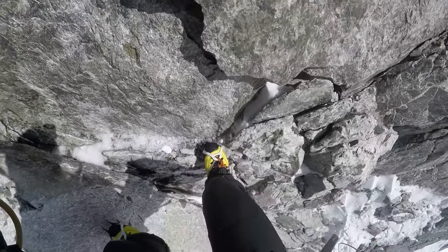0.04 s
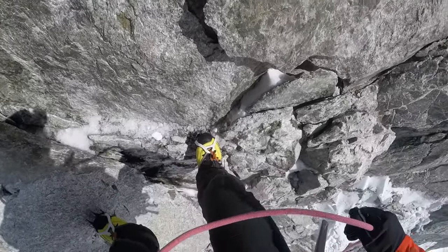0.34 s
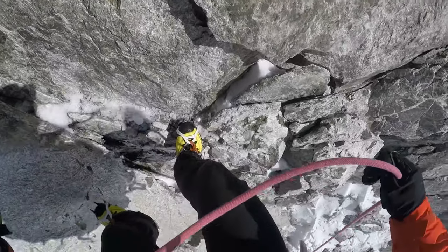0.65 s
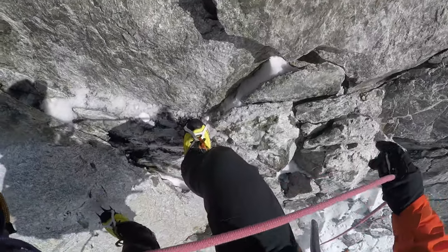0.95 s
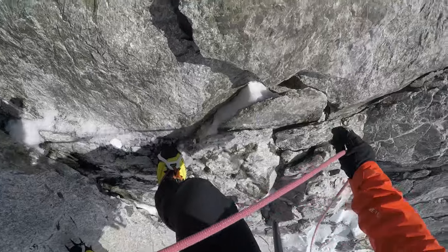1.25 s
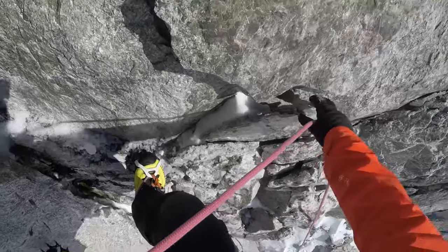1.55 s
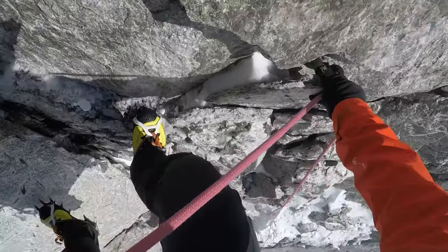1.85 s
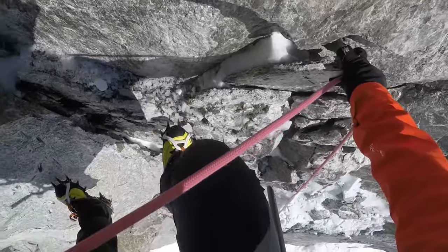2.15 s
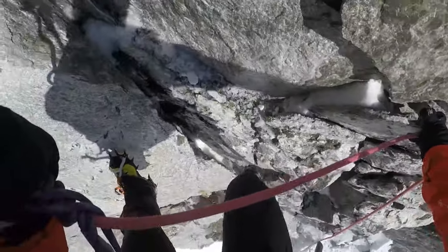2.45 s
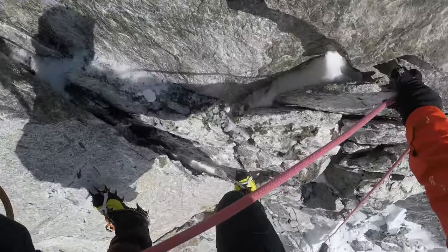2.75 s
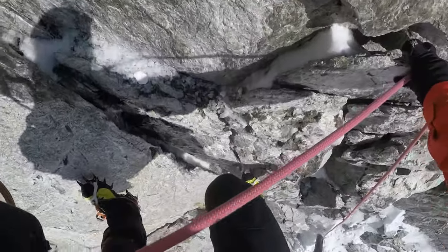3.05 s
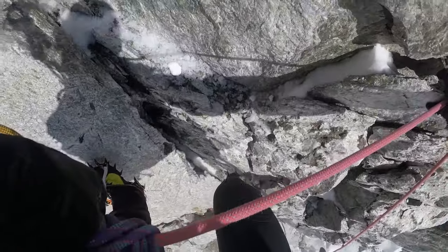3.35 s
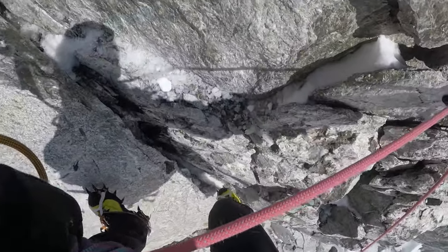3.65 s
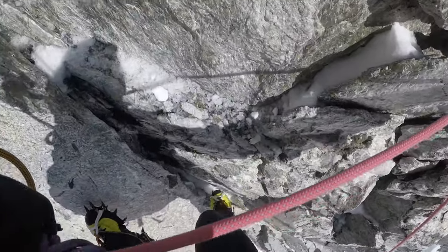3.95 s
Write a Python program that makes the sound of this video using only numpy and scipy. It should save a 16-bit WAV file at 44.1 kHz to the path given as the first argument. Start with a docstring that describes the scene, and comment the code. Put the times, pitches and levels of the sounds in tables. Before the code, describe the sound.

Steel crampon points tick, scrape and faintly squeak on granite as a climber shifts footing, with a cluster of bites midway and one hard strike later. Gusts rumble and pop on the body-worn microphone, and clothing rustles softly.

```python
"""From the start, gusts rumble, thump and pop on a worn camera's two microphone ports; clothing rustles.
A body's length below, steel crampon points tick, bite, scrape and squeak on granite.
Near-mono for about a second, then the sound opens into stereo.
Bites cluster just after 2 s, the pops peak near 2.6 s, and a hard strike lands at 3.3 s."""
import sys
import numpy as np
from scipy import signal
from scipy.fft import rfft, irfft, next_fast_len
from scipy.io import wavfile
from scipy.ndimage import uniform_filter1d, map_coordinates

SR = 44100
rng = np.random.default_rng(int(sys.argv[2]) if len(sys.argv) > 2 else 0)


def master_out(mix):
    """Clip the mix to full scale and print it as 16-bit PCM to the path in sys.argv[1]."""
    frames = np.transpose(np.atleast_2d(mix))
    ceiling = np.clip(frames, -1, 1)
    pcm = np.round(ceiling * 32767).astype(np.int16)
    wavfile.write(sys.argv[1], SR, pcm)


N = 176400
TIME_S = np.arange(N) / SR

# envelopes of clothing, rumble, gusts (time [s], relative level [dB])
RUSTLE_LEVEL = [(0.0, -49), (0.26, -47.5), (0.89, -49.5), (1.71, -47.5), (1.84, -49.5), (2.62, -49.5),
                (2.74, -49.5), (2.85, -45.5), (2.94, -48.5), (3.33, -50.5), (3.83, -50.5), (4.0, -45.5)]
RUMBLE_LEVEL = [(0.0, -19.5), (.14, -23.5), (0.22, -26.5), (.3, -23.5), (0.51, -26), (0.77, -24.5),
                (0.81, -30), (.89, -25.5), (1.04, -24.5), (1.11, -25.5), (1.54, -24.5), (1.63, -25),
                (1.84, -24), (2.1, -25.5), (2.28, -21), (2.35, -24.5), (2.68, -21.5), (2.83, -26.5),
                (3.33, -24), (3.56, -24), (3.99, -25)]
GUST_LEVEL = [(0.0, -23.5), (0.09, -21), (.15, -27), (.21, -42.5), (0.268, -45.5), (0.283, -27), (.33, -27),
              (0.36, -40), (0.41, -24), (0.44, -36), (0.53, -24.5), (0.63, -42), (0.65, -32), (.7, -34.5),
              (0.73, -24), (.78, -32.5), (0.8, -50), (.89, -53), (0.93, -37), (0.95, -32.5), (1.02, -30),
              (1.07, -42), (1.13, -36.5), (1.21, -47.5), (1.32, -29.5), (1.37, -40.5), (1.41, -30),
              (1.53, -31.5), (1.55, -39), (1.83, -35.5), (1.9, -30.5), (1.96, -29), (2.02, -40.5),
              (2.14, -41.5), (2.17, -30.5), (2.24, -40.5), (2.27, -24), (2.35, -30), (2.37, -27),
              (2.51, -27.5), (2.65, -25.5), (2.75, -33.5), (2.88, -31.5), (2.92, -38), (3.05, -28),
              (3.1, -33), (3.2, -31.5), (3.27, -38.5), (3.32, -29), (3.44, -32), (3.46, -41.9),
              (3.5, -28.5), (3.57, -36.5), (3.64, -27), (3.75, -33), (3.87, -32), (3.9, -32), (3.99, -31.5)]
# noise spectra (frequency [Hz], relative density [dB])
RUSTLE_SPECTRUM = [(200, 18), (900, 0), (1500, 2), (2400, -1.5), (3300, -4.5), (4400, -2.5), (4800, -4.5),
                   (5800, 0.5), (7000, -3), (8200, -10), (10000, -11.5), (12500, -19.5), (15000, -55)]
RUMBLE_SPECTRUM = [(10, -5), (25, -2), (60, -0.5), (120, -5), (200, -14), (350, -31.5), (1000, -67)]
BUFFET_SPECTRUM = [(40, -27), (110, -3.5), (170, -1), (280, -4), (500, -10.5), (800, -18), (1300, -30),
                   (2500, -51), (8000, -77)]
POP_SPECTRUM = [(50, -9.5), (200, -2), (450, 0), (800, -6), (1200, -17.5), (2000, -39.5), (6000, -83)]
CLICK_SPECTRUM = [(300, 2), (1200, -7.5), (2500, 2), (4300, 1), (6000, 4), (7100, -1), (8200, -11.5),
                  (9600, -11.5), (11000, -24.5), (15000, -33)]
KNOCK_SPECTRUM = [(80, -95), (300, 1.5), (600, 1.5), (1000, -11.5), (1350, -13), (1900, -12), (3000, -20),
                  (8000, -61)]
# likeness of the ports; eddies push one, pull the other (frequency [Hz], correlation [-1..1])
WIND_CORRELATION = [(30, 0.58), (70, -0.0031), (150, 0.002), (260, -0.63), (450, -0.92), (800, -0.95),
                    (1300, -0.92), (2500, -0.84)]
SOUND_CORRELATION = [(300, 0.23), (2000, 0.18), (4000, 0.66), (7000, 0.043), (12000, 0.08)]
# wind balance (frequency [Hz], left over right [dB])
WIND_BALANCE = [(50, 0), (130, -2), (280, -6), (500, -4.5), (900, 0.5), (2000, -2)]
# small eddies (time [s], relative level [dB])
EDDY_POPS = [(.072, -11.5), (0.287, -33), (0.525, -19), (0.72, -15), (0.746, -22), (1.441, -19),
             (1.579, -19.5), (1.882, -18.5), (1.913, -13.5), (1.951, -15), (1.992, -14), (2.26, -15.5),
             (2.286, -20.5), (2.395, -17.5), (2.411, -12.5), (2.454, -15), (2.492, -14.5), (2.591, -15.5),
             (2.623, -10.5), (2.635, -10.5), (2.646, -12.5), (2.655, -9), (2.997, -19), (3.125, -19.5),
             (3.315, -16.5), (3.497, -22.5), (3.639, -17.5), (3.687, -19.5), (3.76, -20), (3.899, -20)]
# broad eddies (time [s], envelope peak [dB], pitch [Hz])
EDDY_THUMPS = [(0.138, -12, 119), (.286, -11.5, 163), (.409, -12.5, 79.5), (.502, -12.5, 108),
               (.524, -9.5, 121), (.65, -13, 117), (.723, -8.5, 124), (0.737, -16, 263), (.776, -15.5, 108),
               (0.966, -14.5, 153), (1.046, -16, 65), (1.44, -18, 129), (1.525, -11.5, 107),
               (1.915, -13, 209), (2.149, -13, 94), (2.497, -14.5, 110), (2.557, -13, 109),
               (2.686, -13, 69.5), (3.192, -16.5, 101.7), (3.356, -11, 64.4), (3.645, -17.5, 149)]
# ringing prongs (high) and hollow boot (low) (time [s], pitch [Hz], relative level [dB], t60 [s])
PART_RINGS = [(.023, 5940, -22.5, 0.045), (0.055, 4380, -27, 0.018), (.12, 2875, -35.5, 0.038),
              (.12, 5650, -39, 0.042), (.403, 2660, -33.5, 0.023), (.717, 595, -26, 0.038),
              (1.542, 933, -39, 0.059), (2.012, 4130, -32, 0.03), (2.053, 1687, -33, 0.091),
              (2.486, 688, -25, 0.029), (2.489, 2230, -26, 0.042), (2.846, 3690, -33.5, 0.035),
              (2.846, 6660, -30.5, 0.028), (2.961, 4180, -35, 0.047), (3.329, 5900, -32, 0.018),
              (3.329, 4500, -26, .02), (3.793, 3300, -29.5, 0.027)]
# sliding prongs (time [s], length [s], pitch [Hz], relative level [dB], roughness [0..1])
PRONG_SQUEAKS = [(0.032, 0.036, 6760, -30, 0.7), (.38, .018, 2520, -45, 0.5), (0.585, .012, 3170, -47, .6),
                 (1.214, .06, 5190, -50.5, .3), (1.29, 0.062, 5520, -51, .9), (2.2, .05, 5370, -55, .9),
                 (3.162, .03, 1850, -43, .7), (3.353, 0.011, 2920, -29, .2)]
# crampon frame modes (frequency [Hz], relative level [dB], t60 [s])
FRAME_MODES = [(2300, 5, 0.028), (3293, -2, 0.044), (3730, -3.5, 0.043), (4350, 3.5, 0.036),
               (5060, 1, 0.04), (5510, 3.5, 0.046), (5970, 2, 0.051), (6500, -21, .03), (7600, -14, 0.02),
               (7950, -30, .03), (9300, -19, .025)]
# points dragged on rock (time [s], length [s], relative level [dB], boot knock [dB], tilt [dB/octave])
POINT_SCRAPES = [(0.025, 0.042, -33.5, 3, 1.5), (0.052, 0.17, -50.5, 3, 3), (0.481, 0.084, -48.5, 11.5, 4),
                 (0.522, 0.05, -38, 1, -0.5), (1.292, 0.033, -66, -5, 10), (1.673, 0.059, -49.5, -7, 3),
                 (2.045, 0.041, -37, 4.5, 0), (2.524, 0.032, -49, 9, -1), (2.946, 0.023, -44.5, 0.5, 10),
                 (3.155, 0.042, -47, 10, -5), (3.35, 0.023, -43, -13, 0)]
# points striking rock (time [s], relative level [dB], t60 [s], boot knock [dB], tilt [dB/octave])
POINT_STRIKES = [(.002, -26.5, 0.049, 2, 3), (.0225, -22, 0.011, -13, 6), (.038, -27, 0.02, -11, 1),
                 (.056, -27.5, 0.02, -23, 2), (0.112, -39, 0.043, -2, 5), (.156, -46, 0.07, -20, 10),
                 (0.252, -36.5, 0.036, -23, 0), (0.326, -44, .02, -25, 1), (0.404, -35.5, 0.024, -17, 3.5),
                 (.5255, -31, .015, 3, 4), (.529, -34, 0.011, 6, 1), (0.542, -26.5, 0.022, -16, 3),
                 (.5495, -36, 0.011, -7, 1), (.56, -33, .014, 8, -2), (0.622, -39, 0.02, 7, -5),
                 (.829, -43, 0.019, 7, 3), (0.89, -31.5, 0.046, 3, 0.5), (1.113, -43.5, 0.027, 7.5, 8),
                 (1.175, -45.5, 0.049, -10, 4), (1.509, -39.5, 0.026, 6.5, -2),
                 (1.542, -39, 0.063, -18, -2.5), (1.905, -45, 0.0096, -17, -15),
                 (2.0098, -27.5, 0.039, -2, 8), (2.041, -28, 0.035, -8, -2),
                 (2.052, -35.5, 0.023, 17.5, 20), (2.0635, -30, 0.017, -14, 1),
                 (2.0905, -25.5, 0.033, 4, -1), (2.118, -29.5, 0.019, -7, -5.5),
                 (2.196, -30, 0.029, -12, -0.5), (2.321, -39, 0.032, -5, 3), (2.41, -46, 0.018, -19, -11),
                 (2.486, -31, 0.034, 9, -2), (2.555, -34.5, 0.018, -2, -2), (2.758, -30, 0.018, -20, 4),
                 (2.845, -29.5, 0.024, -11, 9.5), (2.957, -42, 0.056, 0, -5), (3.052, -37, 0.078, 3.5, 4),
                 (3.184, -33.5, 0.028, 7.5, 0), (3.3286, -19.5, 0.028, -2, 1.5), (3.335, -31, .014, 7, 6),
                 (3.367, -32.5, 0.041, 7.5, -3), (3.6, -39.5, 0.032, 8, 8), (3.788, -31, 0.048, 5, 3.5),
                 (3.793, -35, 0.026, 9, 4), (3.816, -45.5, 0.038, 18, 1), (3.996, -33, 0.026, 5, -1)]
# stereo image (time [s], width [0..1])
STEREO_WIDTH = [(0, 0.05), (.3, 0.02), (.45, 0), (.87, 0), (1.1, 0.21), (1.4, 0.62)]


def amp(db):
    """Decibels to gain."""
    return 10 ** (np.asarray(db) / 20)


def unit(x):
    """Scale to rms 1; a stereo pair by its centre."""
    centre = x.mean(0) if x.ndim > 1 else x
    return x / np.sqrt(np.mean(centre ** 2) + 1e-20)


def along(points, hz):
    """Interpolate on a log frequency axis."""
    knots_hz, values = np.transpose(points)
    return np.interp(np.log(hz + 1), np.log(knots_hz + 1), values)


def curve(rows):
    """Interpolate in time, one value per sample."""
    return np.interp(TIME_S, *np.transpose(rows))


def wobble(rate_hz):
    """Smooth curve through random knots."""
    knots = rng.standard_normal(int(N * rate_hz / SR) + 4)
    return map_coordinates(knots, [TIME_S * rate_hz], mode="nearest")


def steady(x, samples):
    """Even out the level, keep the finer grain."""
    power = np.mean(np.atleast_2d(x) ** 2, axis=0)
    local_power = np.abs(uniform_filter1d(uniform_filter1d(power, samples), samples))
    return unit(x / np.sqrt(local_power + 1e-9))


def noise(spectrum, correlation=SOUND_CORRELATION, balance=None):
    """Coloured stereo noise, centre rms 1."""
    hz = np.fft.rfftfreq(N, 1 / SR)
    spread_rad = np.arccos(np.clip(along(correlation, hz), -1, 1)) / 2
    coloured = rfft(rng.standard_normal((2, N))) * amp(along(spectrum, hz))
    mid, side = coloured * [np.cos(spread_rad), np.sin(spread_rad)]
    left_gain = amp(along(balance, hz)) if balance else 1
    return unit(irfft(np.array([(mid + side) * left_gain, mid - side]), N))


def rustle(gain_db=2.5):
    """Clothing and air hiss with a fine, uneven grain."""
    grain_db = 2.0 * wobble(rate_hz=35) + 1.6 * wobble(rate_hz=300)
    return amp(curve(RUSTLE_LEVEL) + gain_db + grain_db) * noise(RUSTLE_SPECTRUM)


def turbulence(spectrum, samples):
    """Wind noise on both ports; shared and opposed parts levelled separately."""
    left, right = noise(spectrum, WIND_CORRELATION, WIND_BALANCE)
    mid = steady(left + right, samples)
    side = np.std(left - right) / 2 * steady(left - right, samples)
    return np.array([mid + side, mid - side])


def wind(rumble_db=1, buffet_db=1.5, pop_db=-5.5):
    """Gusts drive lumpy buffeting over a slower rumble; single eddies pop."""
    gust_db = curve(GUST_LEVEL)
    swell_db = curve(RUMBLE_LEVEL) + 0.27 * (gust_db - gust_db.mean())
    rumble = amp(swell_db + rumble_db) * turbulence(RUMBLE_SPECTRUM, samples=4000)
    lumps = steady(amp(4.3 * wobble(rate_hz=160)), samples=1500)
    buffet = amp(gust_db + buffet_db) * lumps * turbulence(BUFFET_SPECTRUM, samples=900)
    eddies = sum(amp(db + pop_db) / (1 + ((TIME_S - at_s) / 0.0029) ** 2) ** 2 for at_s, db in EDDY_POPS)
    pop = turbulence(POP_SPECTRUM, samples=180) + amp(-3) * turbulence(BUFFET_SPECTRUM, samples=300)
    return rumble + buffet + eddies * pop


def thumps(width_cycles=0.77):
    """A broad eddy swings the pressure to and fro on both ports."""
    out = np.zeros(N)
    for at_s, db, hz in EDDY_THUMPS:
        cycles = hz * (TIME_S - at_s)
        envelope = amp(db) / (1 + (cycles / width_cycles) ** 2) ** 2
        out += envelope * np.sin(2 * np.pi * (cycles + rng.random()))
    return out


def rock_face(x, t60_s=0.11, rise_s=0.015):
    """The rock scatters a short reflection."""
    t = np.arange(SR // 4) / SR
    tail = rng.standard_normal((2, len(t))) * amp(-60 * t / t60_s) * (1 - np.exp(-t / rise_s))
    return signal.fftconvolve(x, tail / np.linalg.norm(tail[0]), axes=1)[:, :N]


def pings(rise_s=0.001):
    """A prong or boot slips off an edge, rings and chatters on the grain."""
    waver_rad = wobble(rate_hz=500)
    chatter = unit(amp(3.5 * wobble(rate_hz=490)))
    out = np.zeros(N)
    for at_s, hz, db, t60_s in PART_RINGS:
        age_s = np.clip(TIME_S - at_s, 0, 1)
        envelope = amp(db + 5 - 60 * age_s / t60_s) * (1 - np.exp(-age_s / rise_s))
        out += envelope * np.sin(2 * np.pi * hz * (TIME_S - at_s) + waver_rad)
    return chatter * out


def squeaks():
    """A sliding prong swells and fades, its pitch blurred by the rock grain."""
    waver_rad = 2.2 * wobble(rate_hz=740)
    chatter = steady(amp(3.5 * wobble(rate_hz=350)), samples=400)
    out = np.zeros(N)
    for at_s, length_s, hz, db, roughness in PRONG_SQUEAKS:
        envelope = amp(db + 2.5) * np.sin(np.pi * np.clip((TIME_S - at_s) / length_s, 0, 1))
        out += envelope * np.sin(2 * np.pi * hz * TIME_S + roughness * waver_rad)
    return chatter * out


def frame_ring(force, scatter_db=2):
    """The steel frame rings in its modes, mixed anew by each contact."""
    t = np.arange(SR // 10) / SR
    ring = np.zeros((2, len(t)))
    for hz, db, t60_s in FRAME_MODES:
        envelope = amp(db + scatter_db * rng.normal() - 60 * t / t60_s)
        ring += envelope * np.sin(2 * np.pi * (hz * t + rng.random()) + rng.normal(0, 1.0, (2, 1)))
    return signal.fftconvolve(force[None], ring / np.linalg.norm(ring[0]), axes=1)[:, :len(force)]


def stick_slip(t, rate_hz=260, rise_s=0.0002, fall_s=0.001, scatter_db=3, slide=0.2, count=80):
    """A dragged point catches and lets go: uneven jolts over a steady slide."""
    starts_s = np.cumsum(rng.uniform(0.3, 1.7, count)) / rate_hz
    age_s = np.maximum(t - starts_s[:, None], 0)
    jolts = np.exp(-age_s / fall_s) * (1 - np.exp(-age_s / rise_s)) ** 2
    return unit(slide + amp(scatter_db * rng.standard_normal(count)) @ jolts)


def contacts(t, rise_s=0.0006):
    """Force envelopes: a strike jumps and decays, a scrape swells and judders."""
    for at_s, db, t60_s, knock_db, tilt in POINT_STRIKES:
        yield at_s, amp(db - 0.5 - 60 * t / t60_s) * (1 - np.exp(-t / rise_s)), knock_db, tilt
    for at_s, length_s, db, knock_db, tilt in POINT_SCRAPES:
        swell = np.sin(np.pi * np.clip(t / length_s, 0, 1))
        yield at_s, amp(db) * swell * stick_slip(t), knock_db, tilt


def crampons(ring_db=-3.5):
    """Points crush rock grains: gritty click, frame ring, knock through the boot."""
    size = SR // 5
    t, hz = np.arange(size) / SR, np.fft.rfftfreq(size, 1 / SR)
    pushes = list(contacts(t))
    grit = steady(amp(3 * wobble(rate_hz=1299)), samples=200)
    click, knock = noise(CLICK_SPECTRUM), noise(KNOCK_SPECTRUM)
    octaves = np.log2(np.clip(hz, 1500, 9500) / 5000)
    fade = np.minimum(1, 20 * (1 - t / t[-1]))
    out = np.zeros((2, N + 2 * size))
    for at_s, push, knock_db, tilt in pushes:
        span = round(at_s * SR) + np.arange(size)
        force = push * grit[span % N]
        bite = force * click[:, span % N] + amp(ring_db) * frame_ring(force * rng.standard_normal(size))
        tilted = irfft(rfft(bite) * amp(tilt * octaves), size)
        out[:, span] += tilted * fade + amp(knock_db) * force * knock[:, span % N]
    return out[:, :N]


def scene():
    """Footwork on granite, in wind."""
    feet = crampons()
    return feet + amp(-13) * rock_face(feet) + pings() + squeaks() + rustle() + wind() + thumps()


def record(dry, ceiling=0.84, cutoff_hz=15400):
    """The camera opens to stereo, soft-clips the hardest pops and limits the band."""
    mid = dry.mean(0)
    pair = mid + (dry - mid) * curve(STEREO_WIDTH)
    rounded = pair / (1 + np.abs(pair / ceiling) ** 6) ** (1 / 6)
    size = next_fast_len(N + SR // 10)
    passband = np.fft.rfftfreq(size, 1 / SR) < cutoff_hz
    return irfft(rfft(rounded, size) * passband, size)[:, :N]


dry = scene()
out = record(dry)
master_out(out)
```